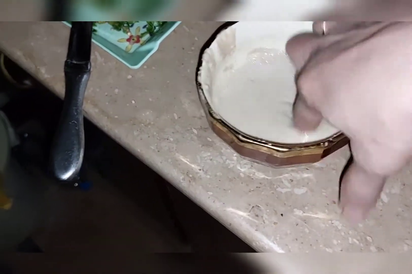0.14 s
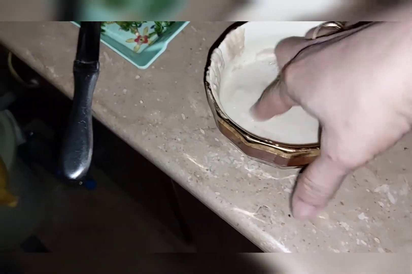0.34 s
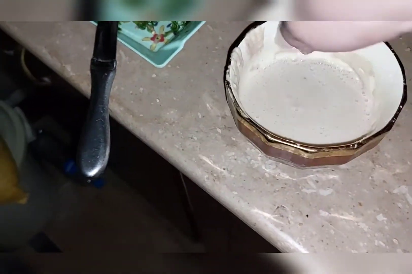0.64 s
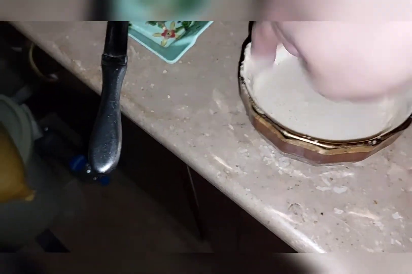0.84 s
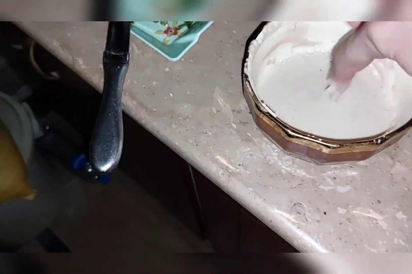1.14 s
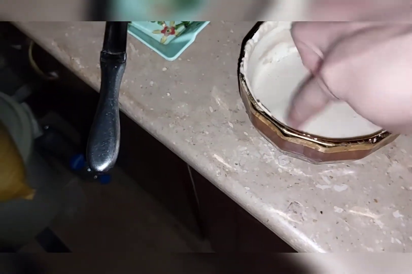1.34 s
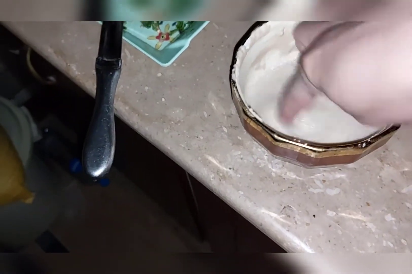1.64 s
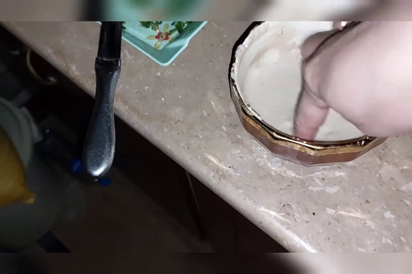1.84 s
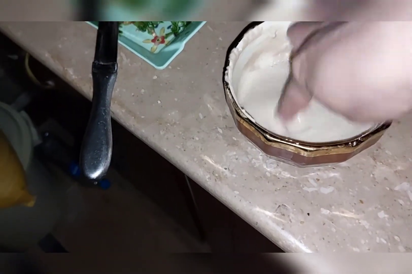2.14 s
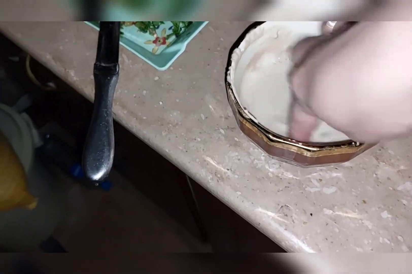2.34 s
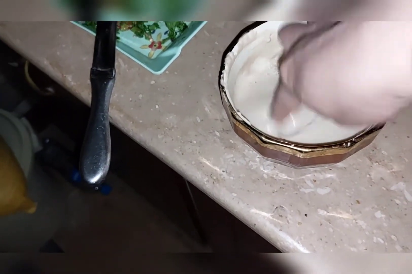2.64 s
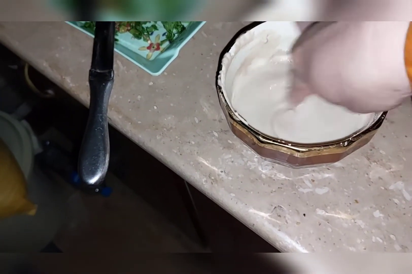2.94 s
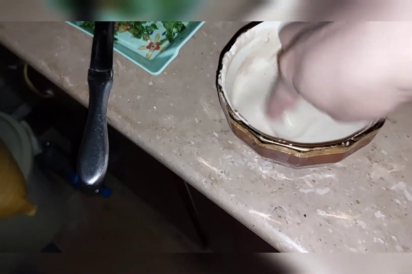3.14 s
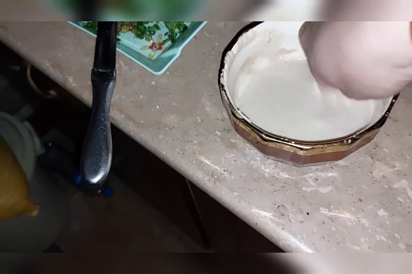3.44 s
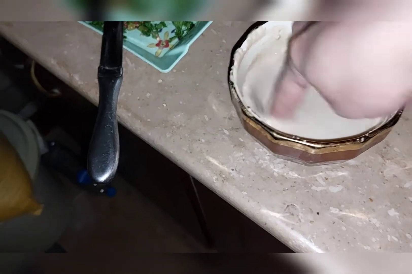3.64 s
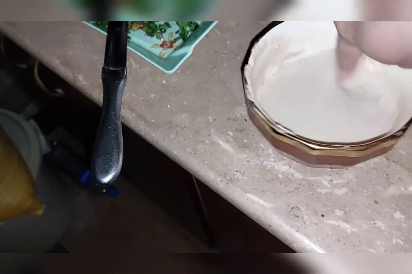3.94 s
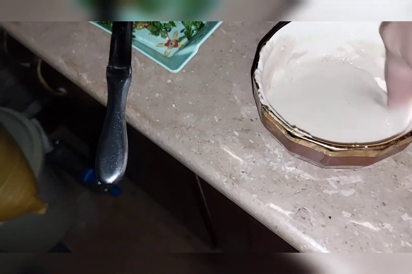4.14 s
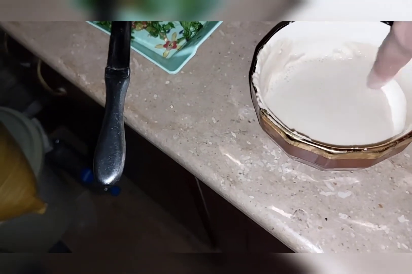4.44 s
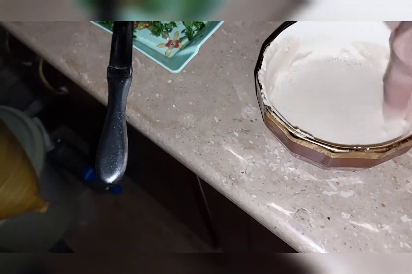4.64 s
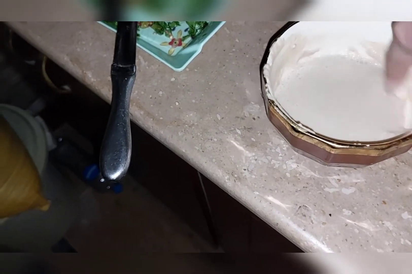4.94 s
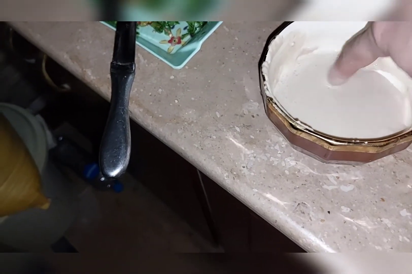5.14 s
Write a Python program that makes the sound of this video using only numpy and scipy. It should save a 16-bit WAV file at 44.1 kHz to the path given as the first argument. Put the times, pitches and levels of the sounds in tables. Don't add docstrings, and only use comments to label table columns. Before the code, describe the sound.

A ceramic bowl knocks hard on a stone worktop, then rocks with soft dull bumps as a finger quietly smears thin batter in a kitchen.

```python
import sys
import numpy as np
from scipy import signal
from scipy.fft import rfft, irfft
from scipy.io import wavfile
from scipy.ndimage import uniform_filter1d

SR = 44100
rng = np.random.default_rng(int(sys.argv[2]) if len(sys.argv) > 2 else 0)


def master(y):
    cut = np.clip(np.atleast_2d(y).T, -1, 1)
    pcm = np.round(cut * 32767)
    wavfile.write(sys.argv[1], SR, pcm.astype(np.int16))


def undo_db(level):
    steps = np.asarray(level, float) / 20
    return 10 ** steps


N = 233453

# pitch in Hz, level in dB per Hz.
RUMBLE_COLOUR = [(13, -35), (22, -6.5), (97, -6), (172, -15), (282, -14.5), (471, -18), (533, -14.5),
                 (682, -16.5), (838, -18), (929, -22), (1590, -28), (1870, -30), (3000, -40), (3900, -66.5),
                 (6600, -120)]
# pitch in Hz, level in dB per Hz.
HISS_COLOUR = [(1760, -52), (3000, -10.5), (3490, -14), (3950, 3), (4420, -4.5), (5140, 0), (5620, -7.5),
               (7160, 1), (8570, -5.5), (9710, -6.5), (10400, -13), (11100, -6.5), (12100, -13.5),
               (15100, -12), (15600, -21)]
RUMBLE_DB, HISS_DB = -62, -74
# pitch in Hz, likeness from 0 to 1.
FLOOR_LIKENESS = [(40, 0.96), (130, 0.05), (300, 0.76), (700, 0), (1500, 0), (4000, 0)]
# pitch in Hz, left minus right in dB.
FLOOR_PAN = [(60, 2), (110, 15), (200, 9), (380, 10), (700, -4.5), (1290, 3.5), (2380, 11), (4400, 0),
             (8120, 1.5), (15000, -7)]

# delay in ms, left level in dB, right level in dB.
ECHOES = [(3.1, -9, -14), (4.1, -14, -7), (6.1, -5, -10), (9.2, -12, -11), (12.5, -8, -14),
          (17.5, -13, -16), (23.8, -13, -12), (29.5, -15, -12)]
# pitch in Hz, level in dB, time to fall 60 dB in seconds.
BODY = [(146.7, -35, 0.83), (284.4, -28, 0.28), (431, -24, 0.29), (545, -39, 0.4), (662, -26.5, 0.22),
        (752.2, -26, 0.23), (1018, -22.5, 0.11), (1121, -34.5, 0.41), (1370, -36.5, 0.27),
        (1567, -28, 0.35), (1873, -27, 0.067), (2195, -14, 0.11)]
# pitch in Hz, time to fall 60 dB in seconds, level in dB.
ROOM = [(157, 0.68, -21.5), (295.2, 0.5, -19.5), (600, 0.42, -20), (1154, 0.45, -23), (2400, 0.51, -22),
        (4864, 0.56, -22.5), (9780, 0.74, -19.5)]
# pitch in Hz, likeness from 0 to 1.
ROOM_LIKENESS = [(200, 0.5), (400, 1), (600, 0.7), (1500, 0)]

# start in seconds, peak in dB, pitch in Hz, left minus right in dB.
SNAPS = [
    (3.5144, -65, 2170, 10),
    (4.417, -62, 2400, 10),
    (4.69, -55.5, 2220, 2),
    (4.837, -62, 2210, 5),
    (4.9084, -61, 2270, 13),
    (5.274, -65, 2020, 13),
]
# start in seconds, peak in dB, pitch in Hz, left minus right in dB.
TICKS = [
    (1.5768, -72, 10200, -1.0),
    (3.5344, -72, 7590, -2.0),
    (3.8544, -62.5, 11700, -1.0),
    (4.0512, -61, 8200, 0.49),
    (4.253, -73, 6960, 0.0),
]
# start in seconds, peak in dB, pitch in Hz.
GRIP = [
    (1.147, -46, 51.1),
    (1.179, -60, 61.9),
]

# start in seconds, hold in seconds, deep rub in dB,
# bright rub above the deep one in dB.
STROKES = [(.05, .06, -46, -9), (.45, .05, -68, -5.5), (.62, 0.027, -76, 1), (.85, 0.15, -60.5, -10),
           (1.045, 0.37, -62, -14), (1.52, 0.14, -57.5, -23), (1.85, 0.016, -75.5, 9),
           (2.02, 0.11, -63, -10.5), (2.2, 0.22, -66.5, 1), (2.38, 0.072, -55.5, -12), (2.56, .03, -72, 1),
           (2.8, 0.026, -56.5, -7), (2.89, 0.052, -58, -11.5), (3.05, 0.095, -65.5, -11),
           (3.17, 0.13, -55, -17), (3.4, 0.2, -61.5, -10), (3.68, 0.047, -74.5, 5), (3.78, .02, -62, -11),
           (3.87, 0.095, -45, -5), (4.03, 0.05, -50, 3), (4.165, 0.016, -60, -18), (4.26, 0.063, -69.5, -8),
           (4.51, .08, -58, -13), (4.632, .01, -47.5, -9), (4.89, 0.052, -51.5, -4), (5.26, .04, -62, -6)]
# start in seconds, hold in seconds,
# wet smear in dB, fizz above the wet smear in dB.
SLIDES = [(0, 0.014, -57.5, -11), (.12, 0.083, -52.5, -23), (.37, .02, -81, -19), (.9, 0.28, -68, -26),
          (1.28, 0.17, -79.5, -17.5), (1.52, 0.025, -65, -28), (1.578, 0.0078, -70, -5.5),
          (1.74, 0.62, -71.5, -20), (2.29, .07, -71.5, -9), (2.48, .12, -73, -14), (2.7, 0.55, -76, -12),
          (3.51, .03, -75, -6), (3.78, 0.042, -70, -11), (3.87, .09, -78.5, 4), (4, 0.055, -53, -17),
          (4.1, 0.061, -69, -16.5), (4.43, 0.034, -65.5, -25), (4.68, .015, -59.5, -21),
          (4.92, 0.067, -53.5, -26), (5.28, .02, -62.5, -25)]

# start in seconds, peak in dB, pitch in Hz, edge level in dB,
# left minus right in dB.
ROCKS = [(1.046, -50, 530, -31, -4), (1.463, -64.5, 810, -35, -13), (1.49, -44, 690, -28, -4),
         (1.764, -36, 680, -7, -1), (1.929, -40, 700, -36, -2), (1.956, -48, 680, -5, 0),
         (2.184, -31.5, 645, -29, -1), (2.436, -41, 724, -42, -6), (2.522, -38, 647, -9, -5),
         (2.694, -35, 600, 3, -3.5), (2.763, -33.5, 662, -5.5, -3), (2.935, -33, 657, -6.5, 0.5),
         (2.984, -46, 650, -20, -3), (3.181, -39, 677, -6, -6), (3.259, -38, 720, -28, -6),
         (3.368, -54.5, 570, -13, 4), (3.742, -40, 650, -15, -3.5), (3.859, -33, 693, -32, -5.5),
         (4.51, -47, 740, -23, -5), (4.617, -41, 686, -9, -9), (4.835, -42.5, 730, -4, -4),
         (5.274, -45.5, 760, -8, -6.5)]
# start in seconds, peak in dB, left minus right in dB.
KNOCKS = [
    (-0.0055, -28.0, -0.5),
    (0.107, -9, -0.5),
    (2.251, -26, -2.5),
    (3.973, -14, -0.5),
]
# pitch in Hz, level in dB per Hz.
BLOWS = [
    [(59, -43), (100, -10), (212, -28), (266, -6), (429, -5.5), (555, -9), (795, -9.5), (1120, -18),
     (1600, -22), (6000, -49.5), (7800, -71.5), (13200, -120)],
    [(59, -50.5), (100, -21.5), (252, -17.5), (287, -4.5), (321, -12.5), (598, -9), (657, -0.5), (736, -12),
     (793, -0.5), (1620, -10.5), (1750, -12.5), (2190, -21.5), (9000, -71.5), (11700, -101), (19800, -120)],
    [(59, -61), (100, -15.5), (177, -23.5), (280, -0.5), (389, -18), (761, -1.5), (1640, -27.5),
     (1810, -41), (2170, -28.5), (2730, -46), (5000, -47), (6500, -70), (11000, -120)],
    [(59, -71), (100, -5.5), (186, -18.5), (271, 3), (341, 0), (657, 3.5), (713, 7), (1110, 7), (1240, 0.5),
     (1970, -5.5), (2640, -26.5), (5000, -50), (6500, -81), (11000, -120)],
]


def read(table, hz):
    rows = np.array(table, float)
    return np.interp(np.log(hz + 1e-9), np.log(rows[:, 0]), rows[:, 1])


def unit(x):
    return x / np.sqrt(np.mean(x ** 2))


def band(x, hz, width, order=2):
    edges = np.clip(hz * 2. ** np.array([-width / 2, width / 2]), 10, SR * .49)
    return signal.sosfilt(signal.butter(order, edges, "bandpass", fs=SR, output="sos"), x)


def pair(size, likeness, pan=((1, 0),), colour=((1, 0),)):
    hz = np.fft.rfftfreq(size, 1 / SR)
    left, other = rfft(rng.standard_normal((2, size)))
    same = np.clip(read(likeness, hz), 0, 1)
    right = same * left + np.sqrt(1 - same ** 2) * other
    tilt = undo_db(read(pan, hz) / 2)
    both = np.array([left * tilt, right / tilt])
    return unit(irfft(both * undo_db(read(colour, hz)), size))


def walk(rate):
    step = int(SR / rate)
    levels = np.repeat(rng.standard_normal(N // step + 1), step)
    return uniform_filter1d(levels, step)[:N]


def add(out, s, sound, pan_db):
    i = int(s * SR)
    sides = undo_db(np.array([[pan_db], [-pan_db]]) / 2)
    sound = sound[:, max(-i, 0):N - i] * sides
    start = max(i, 0)
    out[:, start:start + sound.shape[1]] += sound


def blip(hz, cycles, size=512):
    turns = np.arange(size) / SR * hz - 2 * cycles
    slower = np.where(turns > 0, 1.6, 1)
    return np.cos(2 * np.pi * turns) * np.exp(-(turns / cycles / slower) ** 2)


def pulse(colour, size=2048):
    cepstrum = irfft(read(colour, np.fft.rfftfreq(size, 1 / SR)) * np.log(10) / 20)
    cepstrum[1:size // 2] *= 2
    cepstrum[size // 2 + 1:] = 0
    y = irfft(np.exp(rfft(cepstrum)))
    return y / np.abs(y).max()


def gestures(rows, rise_db_s, fall_db_s):
    s, hold, db, above_db = np.array(rows, float).T[:, :, None]
    t = np.arange(N) / SR
    before, after = np.maximum(s - t, 0), np.maximum(t - s - hold, 0)
    power = undo_db(db - rise_db_s * before - fall_db_s * after) ** 2
    second = power * undo_db(above_db) ** 2
    return np.sqrt(power.sum(axis=0)), np.sqrt(second.sum(axis=0))


def room(near_db, body_db, rise_s):
    t = np.arange(SR * 3 // 4) / SR
    path = np.zeros((2, len(t)))
    path[:, 0] = undo_db(near_db + np.array([-1.5, 1.5]))
    scatter = rng.standard_normal((len(ECHOES), 2))
    for (ms, *db), chance in zip(ECHOES, scatter):
        path[:, int(ms * SR / 1000)] += undo_db(near_db + np.array(db) + chance)

    build = 1 - np.exp(-t / rise_s)
    diffuse = pair(len(t), ROOM_LIKENESS)
    for hz, t60, db in ROOM:
        path += undo_db(db - 60 * t / t60) * band(diffuse, hz, 0.68) * build

    phases = 2 * np.pi * rng.random((len(BODY), 2))
    for (hz, db, t60), (phase, apart) in zip(BODY, phases):
        ports = phase + apart * min(hz / 1220.0, 1) * np.array([[0], [1]])
        ring = np.sin(2 * np.pi * hz * t + ports)
        path += undo_db(db + body_db - 60 * t / t60) * ring * build
    return path


def heard(contact, path):
    return signal.fftconvolve(contact[None], path, axes=1)


def floor():
    rumble = pair(N, FLOOR_LIKENESS, FLOOR_PAN, RUMBLE_COLOUR) * undo_db(RUMBLE_DB + 0.4 * walk(5.2))
    hiss = pair(N, FLOOR_LIKENESS, FLOOR_PAN, HISS_COLOUR) * undo_db(HISS_DB + 0.592 * walk(16))
    cells = signal.stft(rumble + hiss, nperseg=1024)[2]
    streaks = uniform_filter1d(rng.standard_normal(cells.shape[1:]), size=4, axis=1)
    ripple = rng.standard_normal((cells.shape[1], 1))
    flicker = undo_db(4.6 * streaks + 2.82 * ripple)
    return signal.istft(cells * flicker, nperseg=1024)[1][:, :N]


def grip():
    out = np.zeros((2, N))
    for s, db, hz in GRIP:
        add(out, s, undo_db(db) * blip(hz, cycles=0.24, size=8192)[None], 4.5)
    return out


def snaps():
    out = np.zeros((2, N))
    for rows, cycles in ((SNAPS, 1.3), (TICKS, 5.0)):
        for s, db, hz, pan_db in rows:
            path = room(near_db=6.1, body_db=-21, rise_s=0.0032)
            add(out, s, undo_db(db - 5) * heard(blip(hz, cycles), path), pan_db)
    return out


def rub():
    deep, bright = gestures(STROKES, rise_db_s=450, fall_db_s=239.5)
    drag = pair(N, ROOM_LIKENESS) * undo_db(5.4 * walk(40))
    hum = sum(band(drag, hz, 40.0 / hz, order=1) for hz, _, _ in BODY)
    rubbing = 0.62 * drag + hum
    low = undo_db(-5) * unit(band(rubbing, hz=369.6, width=0.98))
    high = undo_db(-3) * unit(band(rubbing, hz=940.0, width=1.21))
    return deep * low + bright * high


def smear():
    wet, fizz = gestures(SLIDES, rise_db_s=300, fall_db_s=218.5)
    grains = rng.standard_normal((2, N)) * undo_db(2.2 * rng.exponential(size=N))
    slide = unit(band(grains, hz=2200., width=.6))
    slide = slide + undo_db(-3) * unit(band(grains, hz=4500., width=.7))
    return wet * undo_db(-11.0) * slide + fizz * unit(band(grains, hz=11400.0, width=0.57))


def rocks():
    out = np.zeros((2, N))
    for s, db, hz, edge_db, pan_db in ROCKS:
        boom_db = -47 + 0.44 * (db + 38.5) - db
        boom = undo_db(boom_db) * blip(354, cycles=0.39)
        edge = undo_db(edge_db) * blip(1.477 * hz, cycles=0.73)
        blow = blip(hz, cycles=0.58) + boom + edge
        path = room(near_db=2, body_db=-11, rise_s=.005)
        add(out, s, undo_db(db - 9.0) * heard(blow, path), pan_db)
    return out


def knocks():
    out = np.zeros((2, N))
    for (s, db, pan_db), colour in zip(KNOCKS, BLOWS):
        path = room(near_db=6, body_db=-12, rise_s=.008)
        add(out, s + 0.001175, undo_db(db - 6.0) * heard(pulse(colour), path), pan_db)
    return out


def scene():
    return floor() + grip() + snaps() + rub() + smear() + rocks() + knocks()


def band_limit(x):
    return signal.sosfilt(signal.butter(12, 15780, fs=SR, output="sos"), x)


def record(dry):
    low_cut = signal.butter(4, 33, "highpass", fs=SR, output="sos")
    top_cut = signal.ellip(8, .2, 50, 15800, fs=SR, output="sos")
    mix = signal.sosfilt(np.vstack([low_cut, top_cut]), dry)
    return band_limit(mix)


dry = scene()
out = record(dry)
master(out)
```